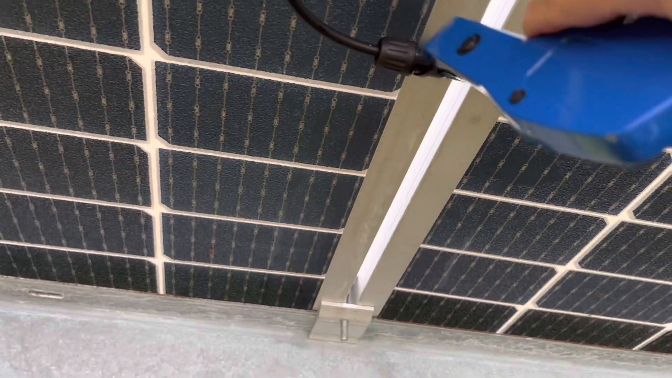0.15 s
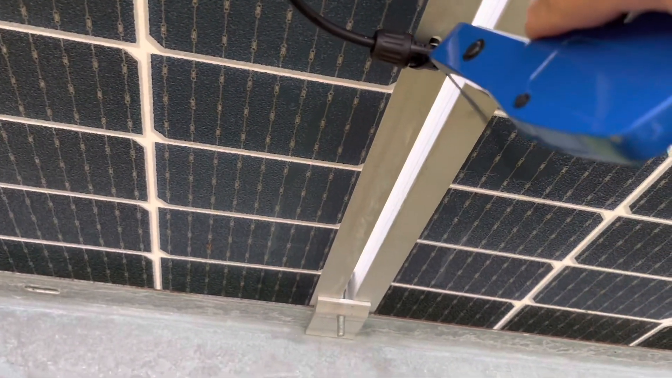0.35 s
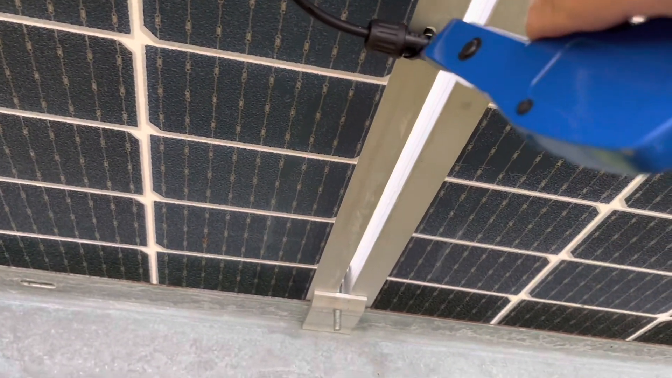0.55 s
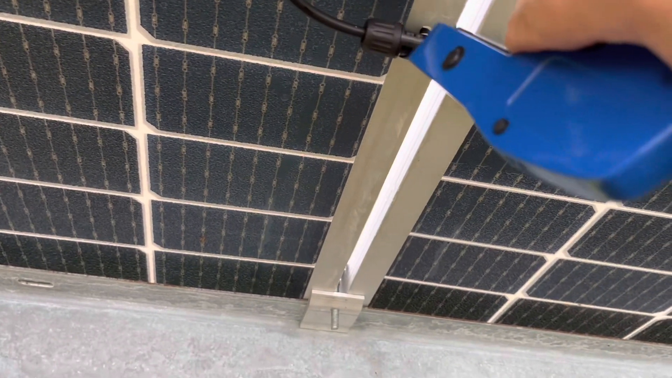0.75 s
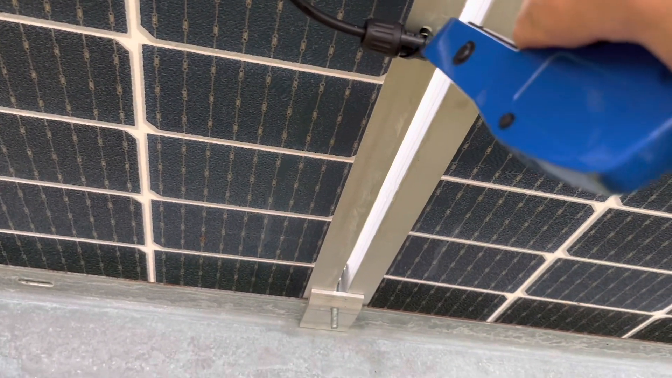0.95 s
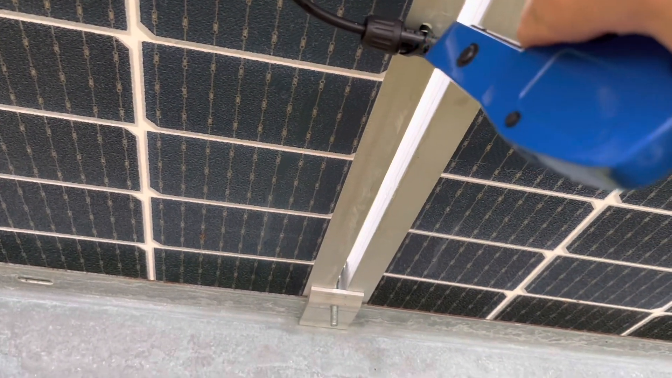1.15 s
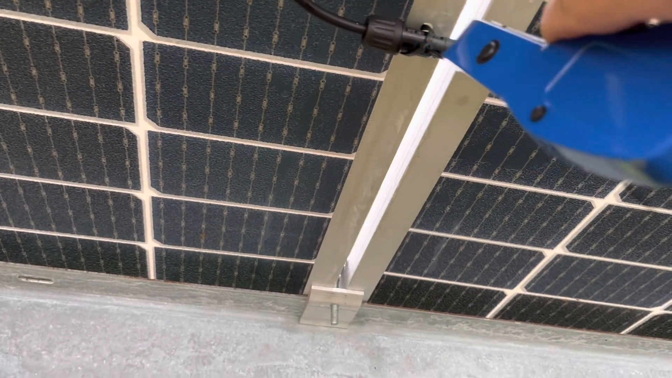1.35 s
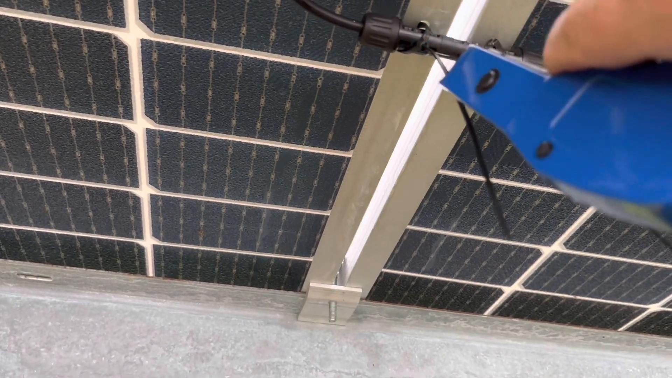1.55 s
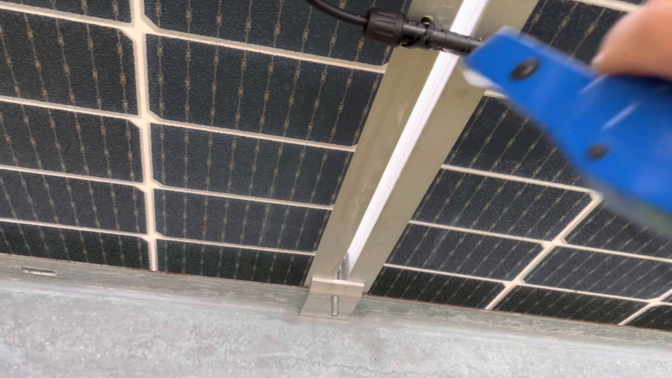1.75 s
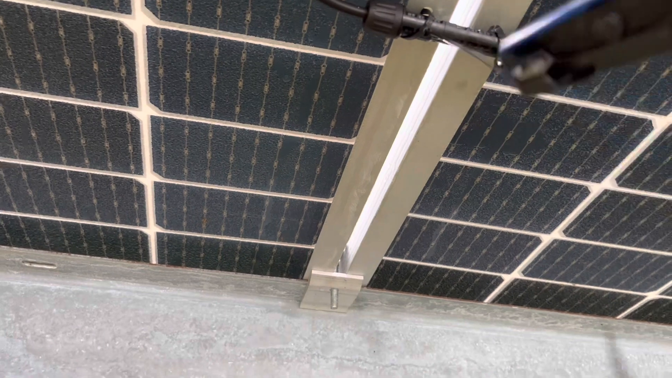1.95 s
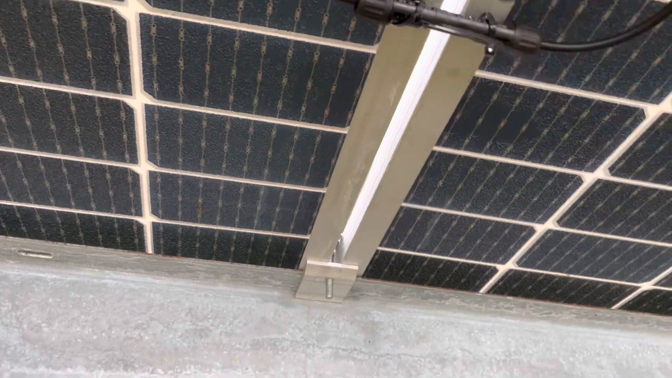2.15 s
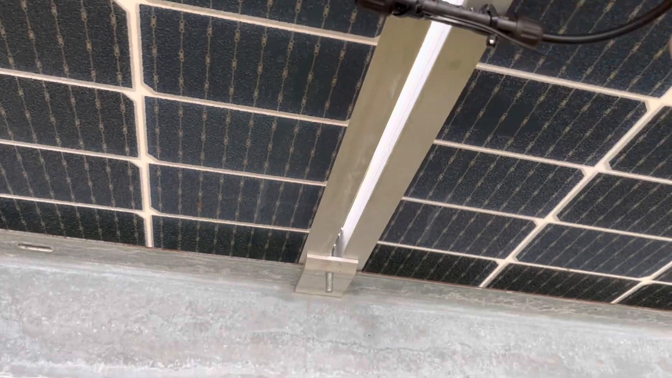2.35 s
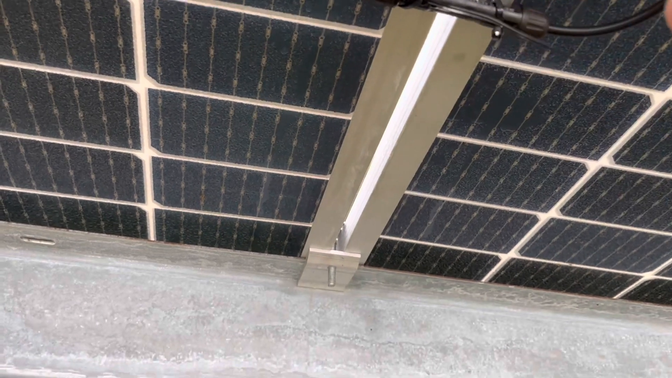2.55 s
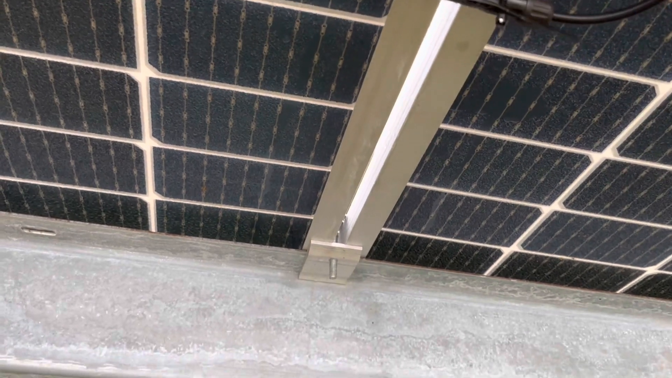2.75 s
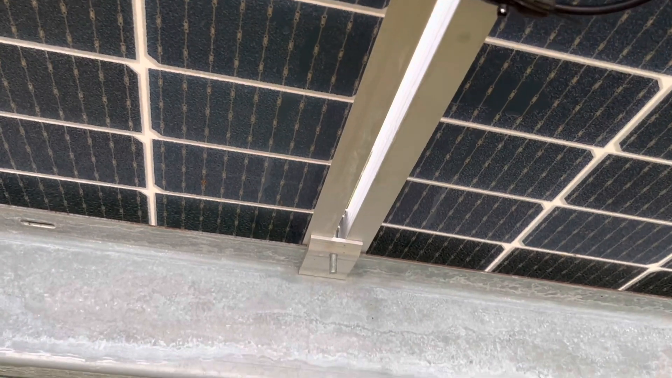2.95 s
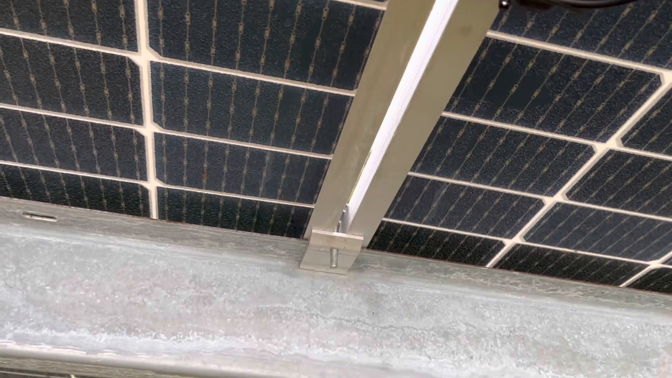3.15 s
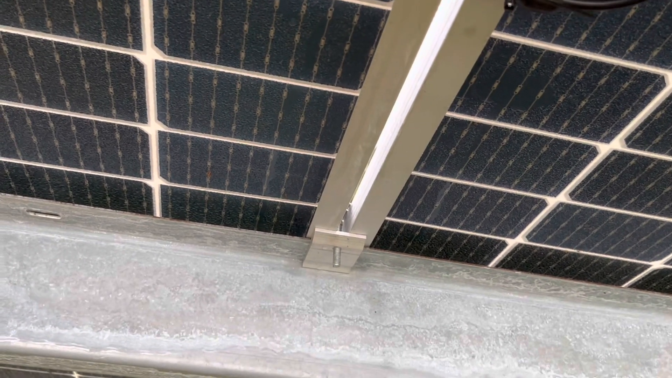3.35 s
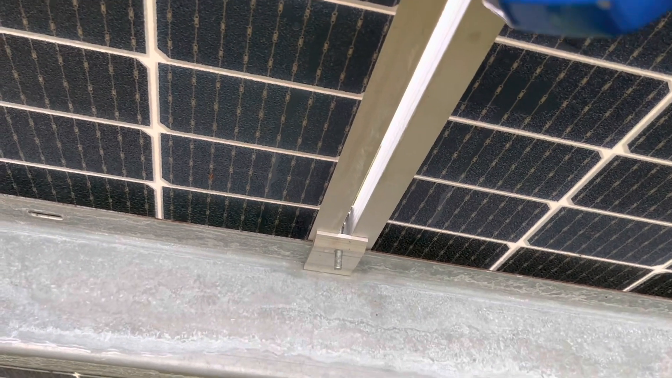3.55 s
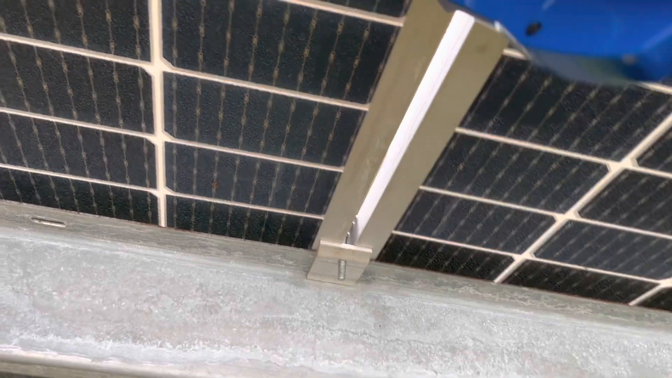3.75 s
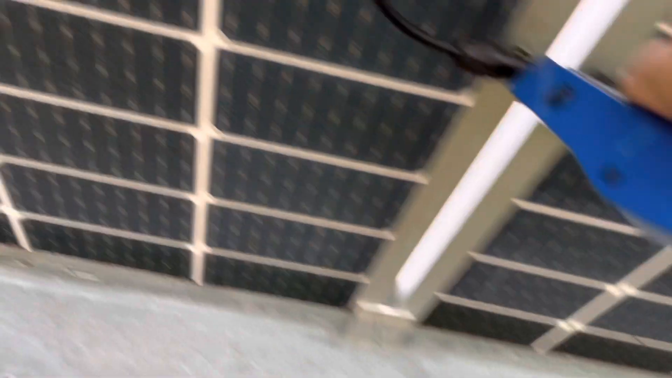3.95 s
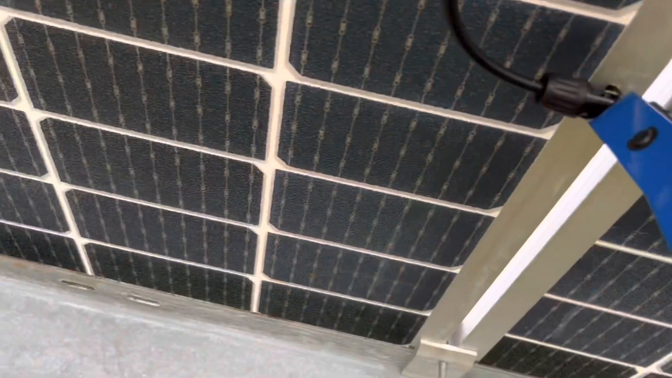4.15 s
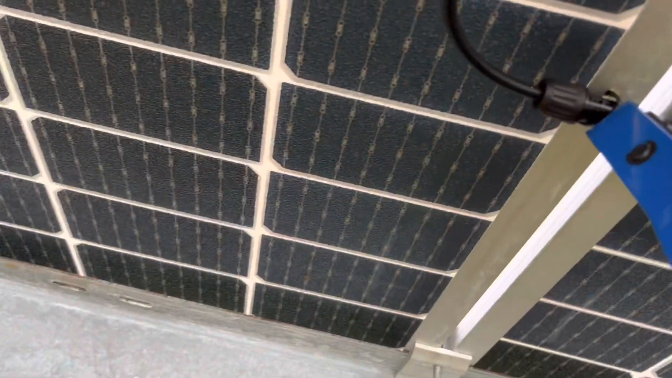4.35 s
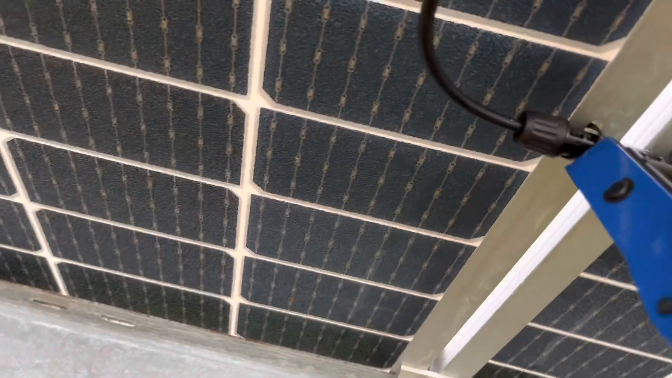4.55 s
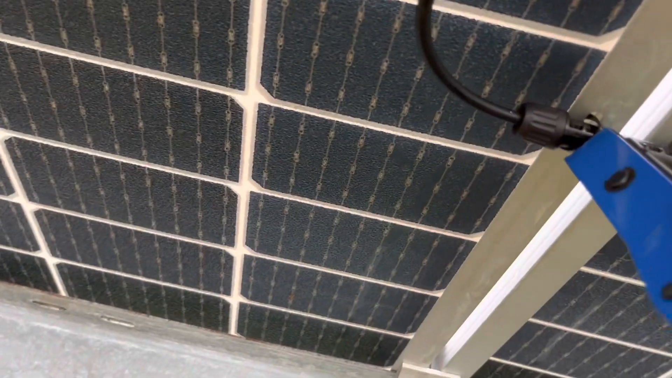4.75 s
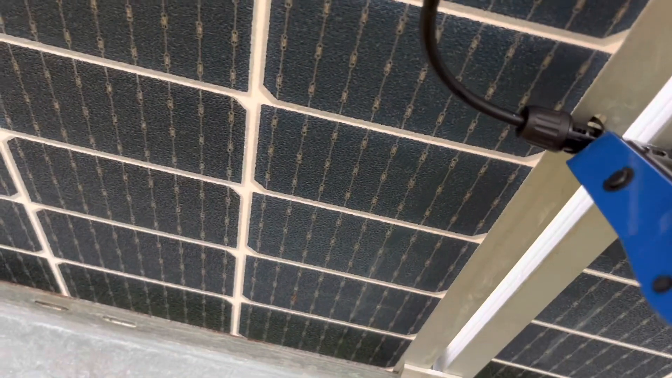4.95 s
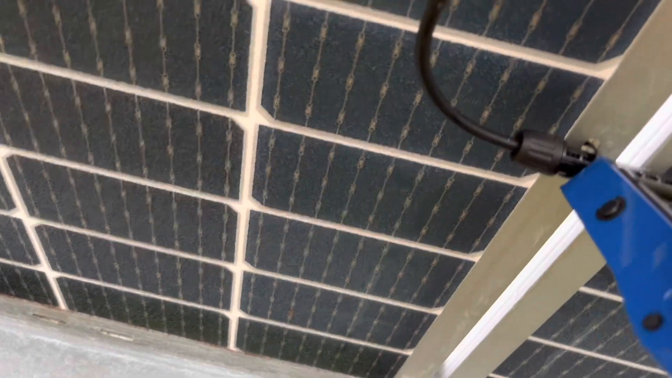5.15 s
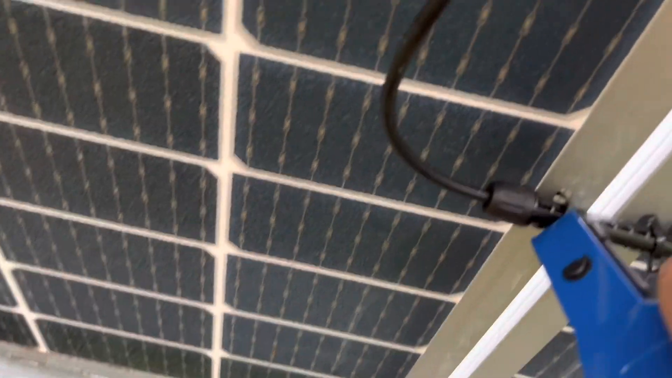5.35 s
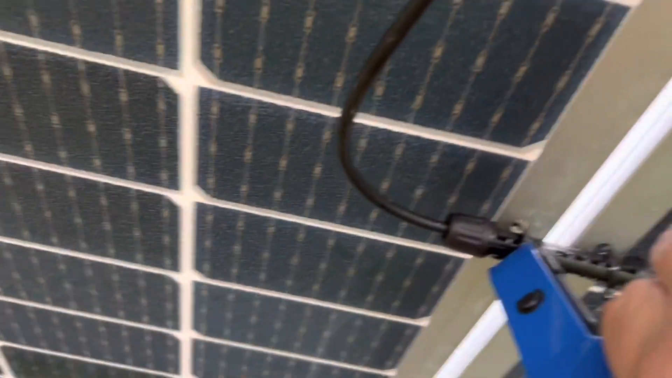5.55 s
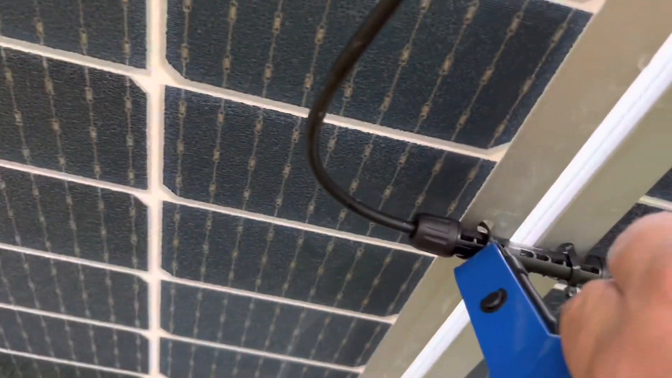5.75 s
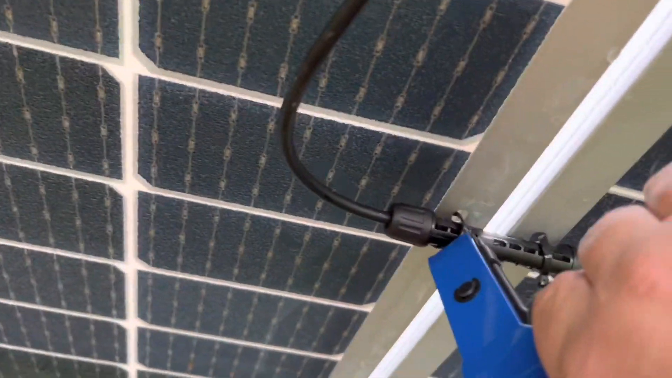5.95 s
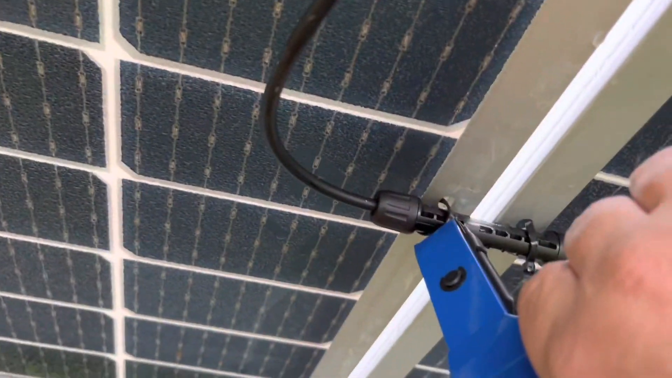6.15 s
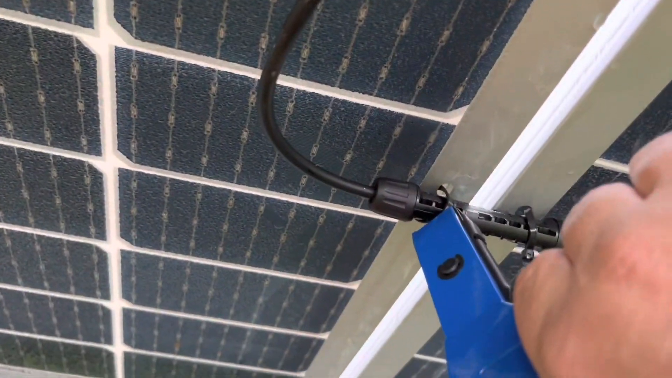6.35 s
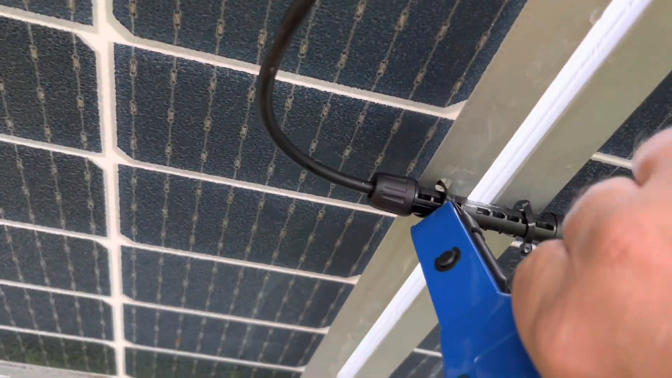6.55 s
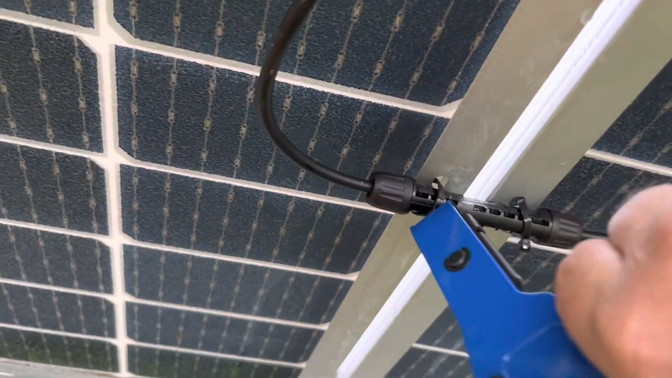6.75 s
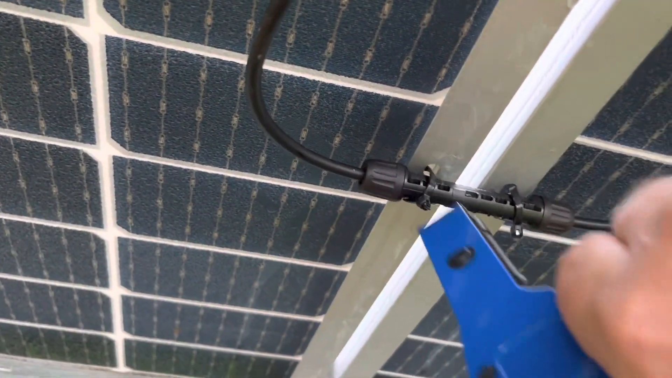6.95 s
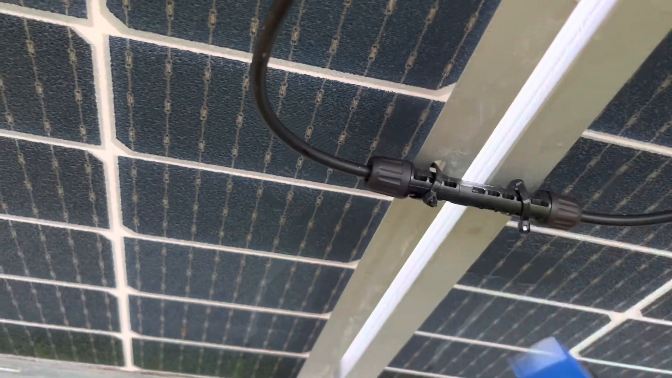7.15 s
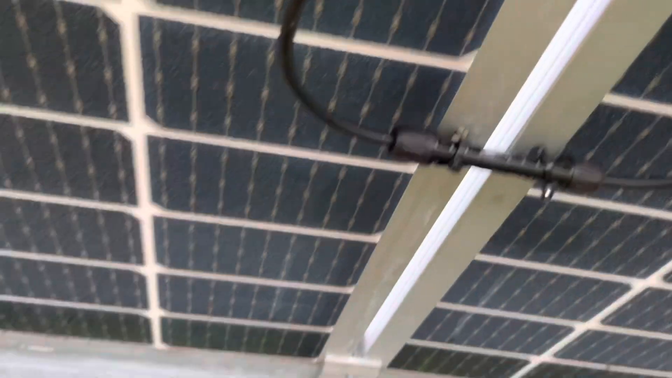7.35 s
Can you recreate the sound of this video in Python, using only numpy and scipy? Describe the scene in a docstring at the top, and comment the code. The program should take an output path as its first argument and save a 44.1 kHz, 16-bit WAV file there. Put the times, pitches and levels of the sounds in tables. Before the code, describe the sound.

Close to the microphone, a hand tool tightens a plastic cable tie with irregular light clicks and short, faint, creaky rasps. After a lull, more clicks and a sharp tick follow. Near the end the tool cuts the tie with one loud, bright snap that briefly sets a solar panel booming, then a small knock. Outdoors, a low rumble and a faint, steady insect chorus continue behind it.

```python
"""Cutting a cable tie under a solar panel

Outdoors, a low rumble, a steady insect chorus and a far bird lie behind the work. A hand tool
tightens a plastic tie: the toothed strap rasps through it by stick-slip friction, and each
contact clicks and excites the tool's damped modes. The cut is a double crack, blade then
spring, and it sets the low modes of the panel booming."""
import sys
import numpy as np
from scipy import signal
from scipy.fft import rfft, irfft, next_fast_len
from scipy.io import wavfile

SR = 44100
rng = np.random.default_rng(int(sys.argv[2]) if len(sys.argv) > 2 else 0)


def put_to_file(sound):
    """Save the sound as 16-bit audio at rate SR, in the file named by the first command-line argument."""
    columns = np.atleast_2d(sound).T  # one column per channel
    safe = np.clip(columns, -1, 1)
    whole_steps = np.round(safe * 32767)
    wavfile.write(sys.argv[1], SR, whole_steps.astype(np.int16))


N = 325899
TIME = np.arange(N) / SR


def from_db(db):
    """Amplitude ratio of a level in decibels."""
    return 10 ** (np.asarray(db) / 20)


def rms_one(x):
    """Normalisation to unit rms."""
    return x / np.sqrt(np.mean(x ** 2) + 1e-20)


def at_hz(points, hz):
    """Interpolation on a logarithmic frequency axis."""
    f, value = np.transpose(points)
    return np.interp(np.log(hz + 1), np.log(f), value)


def drift(per_s):
    """Random modulation of unit rms: straight lines between Gaussian values."""
    knots = rng.standard_normal(int(N / SR * per_s) + 2)
    return rms_one(np.interp(TIME * per_s, np.arange(len(knots)), knots))


def band(x, hz, kind):
    """Second-order Butterworth filtering."""
    return signal.sosfilt(signal.butter(2, hz, kind, fs=SR, output="sos"), x + 1e-18)


# Left-right coherence of nearby sounds: f/Hz, correlation
NEAR_COHERENCE = [(100, 1), (300, 1), (700, 0.077), (1400, 0.4), (2200, 0.44), (4000, 0.35), (8000, 1),
                  (15000, 0.28)]

def noise(spectrum, coherence=NEAR_COHERENCE):
    """Coloured stereo noise of unit rms; the ratio of mid to side sets its coherence."""
    size = next_fast_len(N)
    hz = np.arange(size // 2 + 1) * SR / size
    mid, side = rfft(rng.standard_normal((2, size))) * from_db(at_hz(spectrum, hz))
    alike = at_hz(coherence, hz)
    mid, side = mid * np.sqrt(1 + alike), side * np.sqrt(1 - alike)
    return rms_one(irfft(np.array([mid + side, mid - side]), size)[:, :N])


def decay(start, t60, rise_s=.0004):
    """Envelope of a transient: a fast rise, then exponential decay by 60 dB in t60."""
    out, first = np.zeros(N), int(start * SR)
    age = TIME[:min(N - first, int(2 * t60 * SR))]
    out[first:first + len(age)] = np.exp(-np.log(1000) * age / t60) * (1 - np.exp(-age / rise_s))
    return out


def strikes(rows):
    """Ideal impacts: one impulse for each row that begins with t/s, level/dB."""
    force = np.zeros(N)
    for start, db, *_ in rows:
        force[int(start * SR)] += from_db(db)
    return force


def ring(force, modes, spread_rad):
    """Superposition of damped modes, each about spread_rad apart in phase between left and right."""
    out = np.zeros((2, N))
    for hz, db, t60 in modes:
        pole = np.exp((2j * np.pi * hz - np.log(1000) / t60) / SR)
        swing = signal.lfilter([from_db(db)], [1, -pole], force + 1e-18)
        turn = .5 * spread_rad * rng.uniform(.5, 1.5)
        out += np.real(swing * np.exp(1j * turn * np.array([[1], [-1]])))
    return out


def struck(rows, modes, spread_rad, sustain=1):
    """Impact response with neighbouring modes in antiphase; sustain scales their decay times."""
    force = strikes(rows)
    modes = [(hz, db, t60 * sustain) for hz, db, t60 in modes]
    return ring(force, modes[::2], spread_rad) - ring(force, modes[1::2], spread_rad)


# Spectrum of the open air: f/Hz, level/dB
AIR_SPECTRUM = [(100, 1.5), (500, -0.5), (900, -9.5), (2200, -16), (4700, -22), (9500, -27), (11000, -46),
                (16000, -54)]

def air(level_db):
    """A faint hush, heard as wide because its two sides are nearly incoherent."""
    return from_db(level_db) * noise(AIR_SPECTRUM, [(300, .14), (1000, .036)])


# Spectra of the rumble and of its upper part, a hollow drone: f/Hz, level/dB
RUMBLE_SPECTRUM = [(15, -45.5), (30, -19), (50, -9.5), (75, -4), (105, 1.5), (130, -1), (162, -12),
                   (200, -15), (245, -22.5), (300, -32), (450, -51.5), (800, -78)]
DRONE_SPECTRUM = [(130, -32), (175, -3), (205, 2), (245, -10), (300, -26.5), (600, -64.5)]
# Their envelopes: t/s, relative level/dB
RUMBLE_ENVELOPE = [(0.0, -48), (0.19, -46), (0.45, -46.5), (1.0, -55), (1.26, -58.5), (1.6, -53.5),
                   (2.8, -55), (3.01, -51.5), (3.4, -48.5), (4.1, -49), (4.25, -55), (4.5, -50.5),
                   (4.6, -56), (5.36, -48), (6.2, -52.5), (6.55, -56.5)]
DRONE_ENVELOPE = [(0.0, -57), (0.33, -53), (0.78, -62.5), (1.39, -54.5), (1.64, -57.5), (2.06, -66.5),
                  (2.66, -60.5), (4.25, -66.5), (5.23, -58), (6.55, -59.5)]
# Left-right coherence of both: f/Hz, correlation
LOW_COHERENCE = [(120, .96), (400, .8)]

def rumble(low_db, drone_db, waver_db, waver_per_s):
    """Amplitude-modulated low noise: two bands swell slowly, and the lower one also wavers."""
    low_level = np.interp(TIME, *np.transpose(RUMBLE_ENVELOPE)) + low_db + waver_db * drift(waver_per_s)
    drone_level = np.interp(TIME, *np.transpose(DRONE_ENVELOPE)) + drone_db
    low = from_db(low_level) * noise(RUMBLE_SPECTRUM, LOW_COHERENCE)
    return low + from_db(drone_level) * noise(DRONE_SPECTRUM, LOW_COHERENCE)


# Spectrum of the insect chorus: f/Hz, level/dB
INSECT_SPECTRUM = [(2800, -21), (3550, -8.5), (4300, -30.5), (5300, -28), (5900, -10), (6750, 0),
                   (7200, -2), (7800, -21), (8500, -9), (9250, 8), (9800, -6.5), (10400, -43.5),
                   (12000, -49)]

def insects(level_db, flutter_db):
    """Incoherent summation: many insects merge into three shrill, finely fluttering noise bands."""
    chorus = noise(INSECT_SPECTRUM, [(3500, .2), (6500, .22), (9000, .97)])
    return from_db(level_db + flutter_db * drift(250) + .5 * drift(5)) * chorus


# Calls of a far bird: t/s, duration/s, start f/Hz, end f/Hz, level/dB
BIRD_CALLS = [(2.865, 0.09, 2500, 3950, -62), (3.335, 0.06, 2300, 3500, -66), (7.06, 0.07, 2616, 4140, -63)]

def bird(rough_hz, echo_t60):
    """Rising sweeps, roughened by random frequency modulation and blurred by reverberation."""
    song, jitter_hz = np.zeros(N), rough_hz * drift(400)
    for start, length, start_hz, end_hz, db in BIRD_CALLS:
        progress = np.clip((TIME - start) / length, 0, 1)
        hz = start_hz + (end_hz - start_hz) * progress + jitter_hz
        song += from_db(db) * np.sin(np.pi * progress) * np.sin(2 * np.pi * np.cumsum(hz) / SR)
    echoes = rng.standard_normal((2, SR // 2)) * decay(0, echo_t60)[:SR // 2]
    return signal.fftconvolve(song[None], echoes / np.linalg.norm(echoes[0]), axes=1)[:, :N]


# Spectrum of a hard contact: f/Hz, level/dB
CONTACT_SPECTRUM = [(200, 11.5), (500, -1.5), (1400, 4), (1950, 8), (2400, 1.5), (3300, -3.5), (4000, 1),
                    (6500, -5.5), (9000, 0), (12500, -3.5), (14000, -4), (15000, -11), (16500, -41)]

def contact_noise():
    """Broadband noise for contacts: a brief force spreads its energy over a wide band."""
    return noise(CONTACT_SPECTRUM)


# Faint high rustles of a hand sliding on the tool: t/s, duration/s, relative level/dB
HAND_RUSTLES = [(2.72, 0.07, -74), (4.68, 0.33, -76), (5.98, 0.13, -77), (6.47, 0.15, -71)]

def rustles(grain_db):
    """Sliding friction of a hand on the tool gives short swells of fine, high grains."""
    swells = sum(from_db(db) * np.sin(np.pi * np.clip((TIME - start) / length, 0, 1))
                 for start, length, db in HAND_RUSTLES)
    grains = rms_one(from_db(grain_db * drift(150)))
    return swells * grains * band(contact_noise(), 1300, "high")


# Small dull taps: t/s, level/dB, f/Hz, T60/s
DULL_TAPS = [(3.305, -56.5, 633, 0.074), (3.588, -49, 555, 0.1), (3.656, -48, 470, 0.08),
             (3.686, -51, 570, 0.07), (5.4423, -35.5, 583, 0.02), (5.4440, -20.5, 1560, 0.0063),
             (5.838, -45, 695, 0.014)]

def taps(tick_db):
    """Each tap is a heavily damped oscillation with a tiny tick at its onset."""
    tones = sum(from_db(db) * decay(start, t60) * np.sin(2 * np.pi * hz * (TIME - start))
                for start, db, hz, t60 in DULL_TAPS)
    ticks = sum(from_db(db) * decay(start, t60=.0048) for start, db, *_ in DULL_TAPS)
    return tones + from_db(tick_db) * ticks * contact_noise()


# Jolts of the cable's plastic connector: t/s, level/dB
JOLTS = [(2.2695, -51.5), (4.4535, -52), (4.4722, -51), (4.486, -50), (6.343, -52)]
# Its modes: f/Hz, level/dB, T60/s
CONNECTOR_MODES = [(2550, 1, .045), (2915, -1, .07), (3130, -3, .045), (3975, -3, .05)]

def connector():
    """The jostled connector clacks in free, damped vibration."""
    return struck(JOLTS, CONNECTOR_MODES, spread_rad=.49)


# Resonances of the taut strap in the tool's nose: f/creak pitch, level/dB, T60/s
STRAP_MODES = [(0.341, -14, 0.066), (0.958, 7, 0.054), (1.029, 2, 0.11), (2.17, -23, 0.024)]

def creak(pitch_hz, slips_per_s=700, wander=.035):
    """Tiny random slips excite the strap's resonances, whose pitch wanders with the tension."""
    slips = (rng.random(N) < slips_per_s / SR) * rng.standard_normal(N)
    phase = 2 * np.pi * np.cumsum(pitch_hz * (1 + wander * drift(20))) / SR
    swing = 0
    for multiple, db, t60 in STRAP_MODES:
        carrier = np.exp(1j * multiple * phase)
        pole = from_db(-60 / (t60 * SR))
        swing += carrier * signal.lfilter([from_db(db)], [1, -pole], slips / carrier)
    return rms_one(np.real(swing * np.exp(.27j * np.array([[1], [-1]]))))


def slide(start, length, run_out, attack_s=.0093):
    """Envelope of a sliding stroke: it takes up speed, holds, then runs out exponentially."""
    age = TIME - start
    return np.clip(age / attack_s, 0, 1) * np.exp(-np.clip((age - length) / run_out, 0, 20))


# Friction spectra of the hollow rasp and the duller drag: f/Hz, level/dB
RASP_SPECTRUM = [(500, -16), (1100, -14), (1600, -12), (1950, 3), (2200, 1), (2600, -15), (3200, -17),
                 (4300, -4), (5200, -7), (5800, -13), (8000, -5), (13500, -32), (15000, -34)]
DRAG_SPECTRUM = [(150, -10), (300, 8), (380, 0), (520, 2), (620, -5), (700, -3), (820, -12), (1100, -15),
                 (1400, -11), (2200, -15), (5000, -80)]
# Strokes of the strap through the tool:
# t/s, duration/s, run-out/s, relative level/dB, rasp offset/dB, swell/dB, creak pitch f/Hz
STROKES = [(0.01, 0.39, 0.046, -71, -6.5, -19, 1970), (0.328, 0.2, 0.017, -62.5, -5.5, 8, 2030),
           (0.54, 0.056, 0.048, -60, 3.5, -11, 1907), (1.25, 0.13, 0.018, -64.5, -2.5, 5, 2110),
           (1.385, 0.054, 0.02, -57, -1, 6, 2120), (1.458, 0.34, 0.034, -65.5, -9, -12, 2150),
           (1.68, 0.034, 0.041, -66, 14, 9, 1902), (1.903, 0.068, 0.011, -76.5, 18.5, 7, 2175),
           (3.5, 0.15, .03, -68, -12, 8, 1960), (3.655, 0.052, .015, -57, -10, 0, 2000),
           (3.85, .31, .025, -65, -25, 28, 2100), (4.44, 0.084, 0.036, -61, -4, -14, 2130),
           (6.158, 0.26, 0.018, -89.5, 23.5, 18, 2050), (6.945, 0.073, 0.04, -58.5, -29, -16, 1920)]

def rubbing(hiss_db, creak_db, drag_db, snag_db, teeth_per_s, unevenness):
    """Stick-slip friction: the toothed strap moves in uneven jerks; tension brings out the rasp."""
    rasp_gain, drag_gain = np.zeros((2, N))
    pitch_hz = np.full(N, float(STROKES[0][-1]))
    for start, length, run_out, db, rasp_db, swell_db, hz in STROKES:
        tension_db = swell_db * (np.clip((TIME - start) / length, 0, 1) - .5)
        stroke = from_db(db) * slide(start, length, run_out)
        rasp_gain += from_db(rasp_db + tension_db) * stroke
        drag_gain += from_db(drag_db + .45 * tension_db) * stroke
        pitch_hz[TIME >= start] = hz
    # each tooth lets go at once and is braked until the next one catches
    tooth_phase = np.cumsum(teeth_per_s * np.exp(unevenness * drift(30))) / SR % 1
    braking_db, grain_db, snag_spread_db, snag_t60 = 5.5, 2, 2.5, .038
    jerks = rms_one(from_db(-braking_db * tooth_phase))
    grains = rms_one(from_db(grain_db * drift(400)))
    rasp = from_db(hiss_db) * grains * noise(RASP_SPECTRUM) + from_db(creak_db) * creak(pitch_hz)
    drag = grains * noise(DRAG_SPECTRUM)
    # snagging teeth let go with small bright ticks
    tick_db = snag_db + snag_spread_db * np.clip(drift(51), -2, 1)
    ticks = from_db(tick_db - 60 * tooth_phase / teeth_per_s / snag_t60) * contact_noise()
    return jerks * (rasp_gain * rasp + drag_gain * drag) + rasp_gain * ticks


# Modes of the tool's frame, blade and spring: f/Hz, level/dB, T60/s
TOOL_MODES = [(912, -11, .1), (1880, -3, .05), (1955, 1, .06), (2010, -6, .06), (2350, -2, .08),
              (2715, -2, .07), (2752, -1, .09), (2838, -2, .06), (3345, -1.5, .045), (3483, -8, .08),
              (4300, -8, .055), (4990, -6, .05), (5929, -3, .06), (6265, 1, .055), (6476, -2, .045),
              (6910, -1, .045), (7200, -1, .045), (10400, -3, .035), (12530, 0, .04)]

def tool_ring(blows, spread_rad, sustain=1):
    """Free vibration of the tool; pressing on the tie adds damping, a sustain below 1."""
    return struck(blows, TOOL_MODES, spread_rad, sustain)


# Modes of the tool's hollow grip: f/Hz, level/dB, T60/s
HOUSING_MODES = [(312, -9.5, .1), (417, -4, 0.11), (484, -0.5, 0.067), (1069, -11.5, 0.15),
                 (1220, -8.5, 0.066), (2084, -3.5, 0.048)]
# Contacts of tool and tie, knocking on the housing and bright on the pawl:
# t/s, relative level/dB, knock offset/dB, treble offset/dB
CONTACTS = [(0.059, -54, -22, 5.5), (0.204, -49.5, 9, 10), (0.21, -43, 10, -10), (0.368, -61, -20, 4),
            (0.5734, -46, -21, 5), (0.584, -50.5, -4, -8), (0.618, -58, -5, 8), (0.645, -53.5, -16, -1),
            (0.914, -58, 4, -20), (1.213, -54.5, -1, -6), (1.3284, -34.5, -6.5, -1), (1.78, -38, -5.5, 4.5),
            (1.848, -58.5, -27, -5), (1.908, -48.5, -15, -5.5), (2.2635, -45, -2, -1), (2.297, -54.5, 0, 2),
            (3.694, -56.5, 0, 5), (4.0936, -45, -7, 1.5), (4.4528, -38.5, -2.5, 8), (4.4715, -45.5, 4, -1),
            (4.4854, -44, -7, 10.5), (4.5166, -59, -2, 5), (4.555, -55, -1, 9), (4.5822, -59.5, -8, 1),
            (5.356, -53, -11, 1), (6.2004, -52.5, -20, -1.5), (6.2684, -45.5, -25, -4),
            (6.3203, -49, -25, 3.5), (6.343, -38, -14.5, -7), (6.403, -51.5, -16, 4),
            (6.417, -52.5, -1, -7), (6.9387, -42.5, 15.5, -0.5)]

def clicks(knock_db, body_db, edge_db, top_db, housing_db, ring_db):
    """Impacts crack and ring the tool and housing; the panel and roof scatter a duller tail."""
    scatter_db, bright_scatter_db = -11.5, -21.5
    knock, body, treble = np.zeros((3, N))
    for start, db, knock_offset, treble_offset in CONTACTS:
        crack = from_db(db) * decay(start, t60=.009)
        scatter = from_db(db) * decay(start, t60=.13)
        knock += from_db(knock_offset) * crack
        body += crack + from_db(scatter_db) * scatter
        treble += from_db(treble_offset) * (crack + from_db(bright_scatter_db) * scatter)
    grain = contact_noise()
    knocks = [(start, db + knock_offset) for start, db, knock_offset, _ in CONTACTS]
    return (from_db(knock_db) * band(grain * knock, [330, 1250], "band")
            + from_db(body_db) * band(grain * body, [1550, 3400], "band")
            + from_db(edge_db) * band(contact_noise() * treble, [3700, 8500], "band")
            + from_db(top_db) * band(grain * treble, 7200, "high")
            + from_db(housing_db) * struck(knocks, HOUSING_MODES, spread_rad=.36)
            + from_db(ring_db) * tool_ring(CONTACTS, spread_rad=.22, sustain=.4))


# Soft pushes on the panel: t/s, relative level/dB, duration/s
PUSHES = [(4.128, -36.5, 0.0047), (4.153, -36.5, 0.0028), (4.162, -37, 0.0061), (6.629, -18, 0.0057),
          (6.635, -9.5, 0.0089), (6.884, -27.5, 0.0084)]
# Modes of the panel and its frame: f/Hz, level/dB, T60/s
PANEL_MODES = [(43, -29, 2.5), (57.3, -22, 1.3), (71.9, -6.5, .39), (75.6, -16.5, 1.29), (109.5, 2, .091),
               (145, -11, .28), (204, -17, .19), (238.8, -15.5, .58), (350, -24, .31), (421, -13, .45),
               (488, -16, .55), (580, -18, .21), (915, -23, .35), (1060, -23, .42)]

def panel(blow, blow_db, gain_db):
    """Contact time limits bandwidth: soft pushes drive the low modes, a hard blow the higher too."""
    force = from_db(blow_db) * strikes([blow])
    for start, db, length in PUSHES:
        push, first = np.sin(np.linspace(0, np.pi, int(length * SR))), int(start * SR)
        force[first:first + len(push)] += from_db(db) * push / push.sum()
    return from_db(gain_db) * ring(force, PANEL_MODES, spread_rad=.3)


# Spectra of the cut and of the dull, low wash of the panel ringing on after it: f/Hz, level/dB
CUT_SPECTRUM = [(100, -0.5), (250, 3.5), (480, -2.5), (700, -9.5), (1000, -9), (1350, -7.5), (1900, 2.5),
                (2300, -3), (3300, 4.5), (4200, -4), (6700, -1.5), (9200, 6), (10500, -2), (12700, -2.5),
                (14000, -3), (14800, -20.5)]
WASH_SPECTRUM = [(120, 13), (250, -6), (480, 1), (700, -11.5), (1020, -11.5), (1400, -25), (2500, -32),
                 (6000, -48)]
# The blade parts the tie, the spring slams home, then bounces: t/s, level/dB, T60/s
CUT_CRACKS = [(6.6225, -1.5, 0.007), (6.6266, -6, 0.013), (6.6292, -15, 0.007)]
SPRING_SLAM = CUT_CRACKS[1]

def cut(ring_db, ground_db, ground_delay_s, scatter_db, wash_db):
    """Sudden release of tension: cracks ring the tool and panel, with ground reflection and scatter."""
    slam_s = SPRING_SLAM[0]
    cracks = sum(from_db(db) * decay(start, t60) for start, db, t60 in CUT_CRACKS)
    direct = noise(CUT_SPECTRUM) * cracks + from_db(ring_db) * tool_ring([SPRING_SLAM], spread_rad=1)
    ground = from_db(ground_db) * np.pad(direct, [(0, 0), (int(ground_delay_s * SR), 0)])[:, :N]
    scatter = from_db(scatter_db) * band(noise(CUT_SPECTRUM), 9700, "low") * decay(slam_s, t60=.14)
    wash = from_db(wash_db) * noise(WASH_SPECTRUM) * decay(slam_s, t60=.59)
    return direct + ground + scatter + wash


def scene():
    """Linear superposition of the open air, the tool close by and the panel above it."""
    return (air(level_db=-72)
            + rumble(low_db=2.5, drone_db=2, waver_db=1.92, waver_per_s=14)
            + insects(level_db=-63.5, flutter_db=.5)
            + bird(rough_hz=200, echo_t60=.35)
            + rustles(grain_db=1.5) + taps(tick_db=-10.5) + connector()
            + rubbing(hiss_db=-5, creak_db=-4.5, drag_db=4.5, snag_db=-7, teeth_per_s=32, unevenness=.31)
            + clicks(knock_db=11.5, body_db=4.5, edge_db=9, top_db=5.5, housing_db=-9.5, ring_db=-12)
            + panel(SPRING_SLAM, blow_db=-25.5, gain_db=5.5)
            + cut(ring_db=-18.5, ground_db=-20, ground_delay_s=.018, scatter_db=-27, wash_db=-28))


# Phase lag of the left microphone port, which resonates unlike the right: f/Hz, lag/rad
LEFT_PORT_LAG = [(4500, 0), (6500, 1.2), (8200, 3.1), (9700, 4.2), (11000, 6.2), (13000, 6.4), (15000, 9.4)]

def record(dry):
    """Unequal port resonances shift the treble's phase; filters cut the deepest bass and the top."""
    size = next_fast_len(N + SR // 10)
    hz = np.arange(size // 2 + 1) * SR / size
    left = irfft(rfft(dry[0], size) * np.exp(-1j * at_hz(LEFT_PORT_LAG, hz)), size)[:N]
    ports = band(np.array([left, dry[1]]), 33, "high")
    return signal.sosfilt(signal.ellip(10, .1, 80, 16200, fs=SR, output="sos"), ports)


dry = scene()
out = record(dry)
put_to_file(out)
```